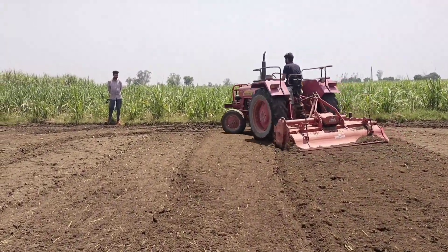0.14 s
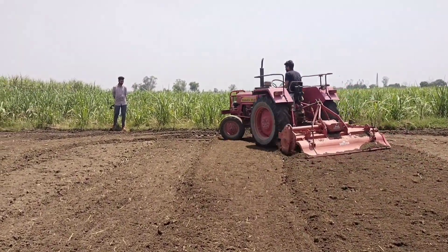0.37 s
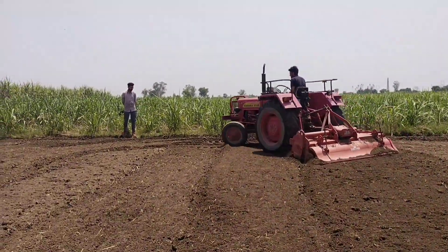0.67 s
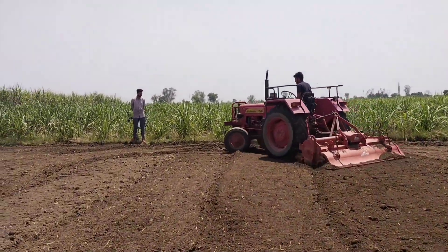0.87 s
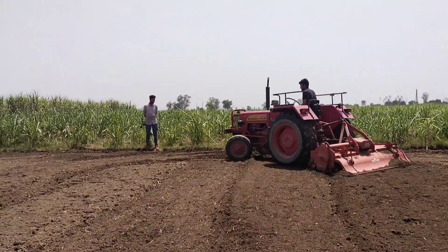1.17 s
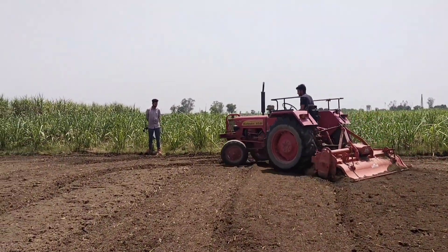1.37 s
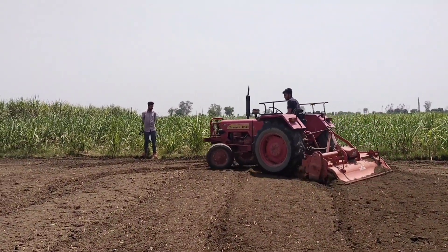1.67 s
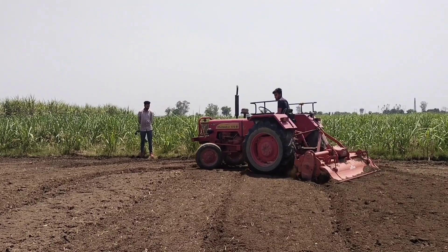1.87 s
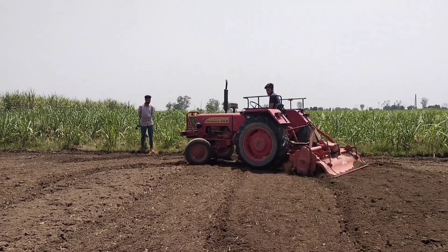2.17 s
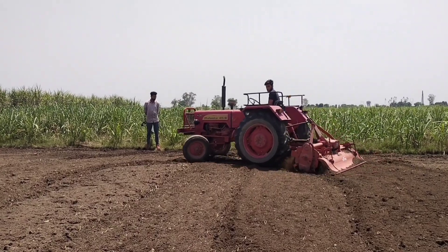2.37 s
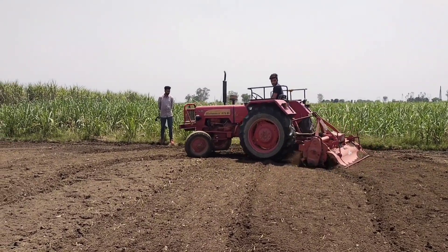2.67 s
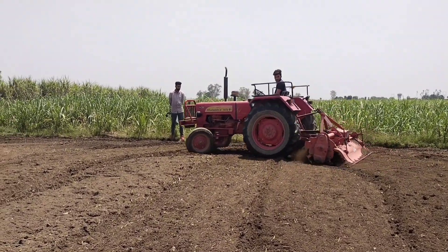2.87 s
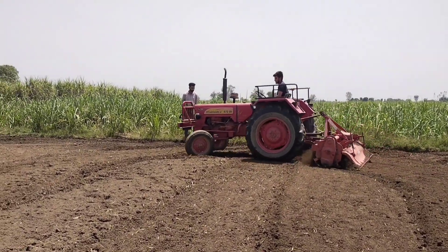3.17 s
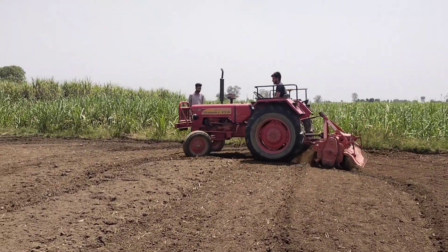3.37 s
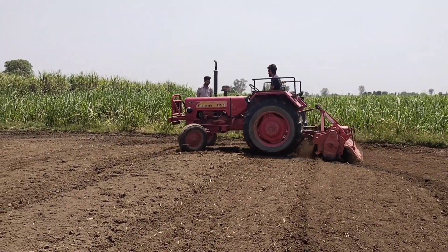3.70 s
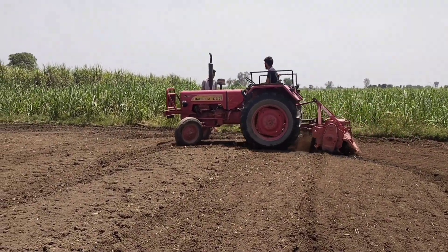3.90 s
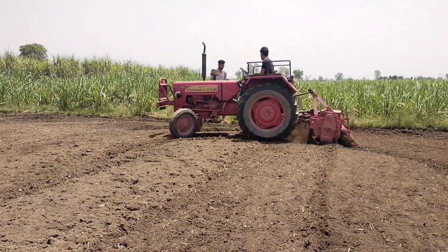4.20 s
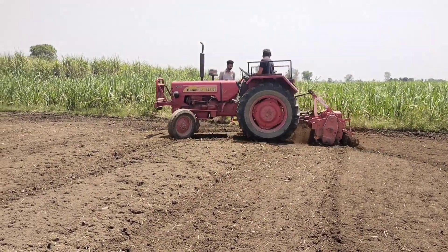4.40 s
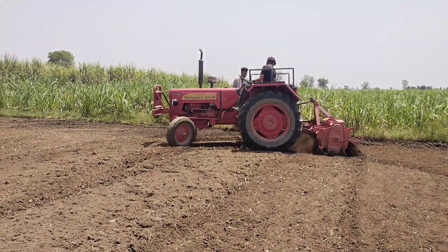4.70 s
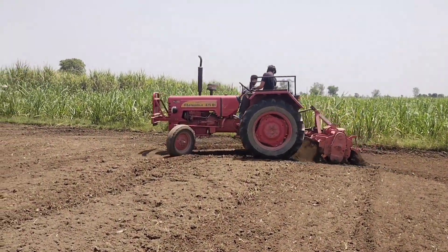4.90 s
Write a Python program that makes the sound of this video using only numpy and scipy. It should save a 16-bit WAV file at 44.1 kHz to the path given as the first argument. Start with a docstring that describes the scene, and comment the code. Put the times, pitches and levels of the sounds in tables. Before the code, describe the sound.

Close outdoor tractor and rotary tiller: rapid diesel chatter, rattling panels, whining gears and scattered metal knocks, growing brighter as the machine turns.

```python
"""A four-cylinder diesel tractor drags a rotary tiller round a bare field, some metres from a hand-held phone.
From the start: exhaust beats built from sines, a gear whine, a clatter of noise that swells at every firing, and
ringing sheet metal made of narrow noise. The clatter comes straight and again off the soil; the walking bearer
makes that echo bob. The engine sags near 1.4 s as the tiller bites, then recovers; heavy knocks come from 0.5 s and
sharp clacks from 1.6 s. From 3.4 s a bright band climbs, the tractor turns and the phone is lowered."""
import sys
import numpy as np
from scipy import signal
from scipy.fft import rfft, irfft
from scipy.io import wavfile
from scipy.ndimage import uniform_filter1d, map_coordinates

SR = 44100
rng = np.random.default_rng(int(sys.argv[2]) if len(sys.argv) > 2 else 0)


def generate_wav(signal):
    """Clip the signal to [-1, 1] and save it as 16-bit WAV at the path in sys.argv[1]."""
    frames = np.transpose(np.atleast_2d(signal))
    scaled = np.clip(frames, -1, 1) * 32767
    pcm = np.round(scaled).astype(np.int16)
    wavfile.write(sys.argv[1], SR, pcm)


N = 222705  # length in samples

# Engine speed. Each row: time in seconds, firings per second in Hz.
FIRING_RATE = [(0.0, 62.38), (0.34, 61.65), (0.67, 61.21), (1.01, 60.41), (1.35, 57.99), (1.68, 58.53),
               (2.02, 60.9), (2.36, 62.11), (2.69, 61.46), (3.03, 63.87), (3.37, 62.94), (3.7, 61.44),
               (4.04, 61.95), (4.38, 62.44), (4.71, 62.6), (5.05, 63.39)]
FIRING_START = .57  # firings already counted at 0 s
KNOCK_AT = .62  # share of a firing period from the exhaust beat to the knock
# How hard each cylinder knocks, one number per cylinder, in the units of the throb (0 is average).
CYLINDER_KNOCK = [0, -.5, .4, .8]

# The turn of the machine. Each row: time in seconds, how far it has turned (0-1).
TURN = [(0, 0.01), (3.6, 0.01), (4.0, 0.07), (4.3, 0.64), (4.7, .95), (5.05, 0.98)]
# The lowering of the phone. Each row: time in seconds, how far it has been lowered (0-1).
LOWERED = [(0, 0.08), (3.5, 0.04), (3.75, .2), (3.9, 0.27), (4.05, 0.57), (4.25, 0.53), (4.55, 0.95),
           (5.05, 1)]
LEAD_MS, LEAD_TURNED_MS = 0.039, -0.0036  # how much earlier the left port hears, before and after the turn
SOIL_MS, SOIL_LOWERED_MS = 1.586, 1.251  # soil echo delay before and after the phone is lowered
BOB_MS, BOB_PERIOD_S, BOB_LOW_S = 0.07, 0.752, 0.13  # the walking bearer lifts and lowers the phone
SOIL_PHASE, SOIL_PHASE_TURNED = 0.23, 0.98  # phase lead that loose soil gives the echo, rad
UNLIKE_ECHO_DELAY = 1.001  # soil echo delay of the noise that differs between the two ports, as a multiple of the shared noise's
HIGH_ECHO_TURNED = 0.34  # factor on the soil echo once the machine has turned: on the noise that differs between the ports, and on all echo above 3 kHz

# Exhaust. Each row: time in seconds, stack boom in dB, steady hum in dB.
EXHAUST_LEVELS = [(0.0, -35, -37.5), (0.15, -45, -43), (0.45, -51.5, -51.5), (1.03, -53, -53.5),
                  (1.2, -45, -64), (1.32, -42, -57), (1.41, -49, -55), (1.5, -40, -60), (1.8, -46, -68),
                  (2.1, -41, -62), (2.25, -47, -46.5), (2.42, -46.5, -55), (2.56, -37.5, -42),
                  (2.72, -39.5, -59.5), (2.92, -35.5, -59), (3.01, -34.5, -62), (3.07, -37, -58),
                  (3.25, -37.5, -58), (3.31, -38, -57), (3.36, -32, -55), (3.41, -40, -56),
                  (3.46, -32, -50), (3.52, -38, -48), (3.62, -34, -58), (3.71, -41, -60), (3.79, -33, -64),
                  (3.86, -42, -54), (3.95, -39.5, -48.5), (4.1, -41.5, -59.5), (4.17, -39, -54),
                  (4.3, -39.5, -48.5), (4.4, -41, -50), (4.6, -33, -57), (4.75, -40.5, -54),
                  (5.05, -38, -45)]
# Tones in the boom. Each row: multiple of the four-firing cycle, level against the other tones in dB.
BOOM_TONES = [(3, -28), (5, -20), (6, -31), (7, -13), (8, 4), (9, -3), (10, -5), (11, -7), (12, -8.5),
              (13, -13.5), (14, -21)]
HUM_HZ = 271
BEAT_DB, BEAT_RISE_DB_PER_S = -58, .5  # firing beat at the start, and its gain as the machine nears
EXHAUST_PAN_DB, EXHAUST_SWAY_DB = 0.74, 0.4  # left minus right, and how it sways in the hand

# Gear whine. Each row: time in seconds, pitch in Hz, level in dB, share of haze in its power (0-1).
WHINE = [(0, 1682, -46.5, 0.6), (.9, 1710, -42, 0.7), (1.25, 1670, -42.5, 0.3), (1.5, 1666, -46.5, 1),
         (1.7, 1714, -37.5, 0), (1.95, 1715, -35, 0.3), (2.2, 1725, -35, 0.25), (2.7, 1713, -35, 0.1),
         (2.95, 1741, -47, 0.2), (3.15, 1724, -38.5, 0.5), (3.45, 1732, -39.5, .2), (3.55, 1747, -41, 0.7),
         (3.75, 1723, -35.5, 0.8), (3.95, 1715, -33.5, 0.06), (4.3, 1700, -32, 0.5), (4.6, 1696, -29.5, .4),
         (4.8, 1711, -29, 0.46), (5.05, 1695, -34, 0.2)]
WHINE_PULSE_DB = 2.6  # swell once a crankshaft turn
WHINE_DIP_DB, WHINE_DIP_AT = 1.6, 1.2  # dip once a cycle, centred on this firing

# Frequency bands of the parts. Each row: from Hz, to Hz, throb in dB (twice its spread), flicker in dB,
# share unlike at the two ports, extra lead of the left port round the phone's body in ms,
# strength of the soil echo left, strength of the soil echo right.
BANDS = [(74.6, 533, 3, -0.5, 0.025, 0.0073, 0.5, 0.5), (701, 1010, 1.5, 1.5, 0.071, 0.0069, 1, 0.48),
         (1096, 1580, 2, 1.8, 0.11, 0.027, 0.85, 0.87), (1730, 2780, 2.5, 0.45, 0.21, 0.053, 1, 0.38),
         (2640, 3310, 2.5, 1.74, 0.44, 0.078, 0.9, 0.19), (3400, 5520, 2.8, 1.1, 0.69, 0.0044, 0.85, 0.15),
         (6500, 8600, 3.5, 1.74, 1, 0.0033, 0.5, 0.13), (10400, 48000, 2.5, 2.5, 0.4, -0.025, .05, .05)]
# Tone colour of the clatter; only its shape matters. Each row: frequency in Hz, relative level in dB.
COLOUR = [(35, -47), (60, -17), (87, -8), (124, -7), (227, -3), (379, 1.5), (837, -13), (1010, -4),
          (1330, -12.5), (1570, -5.5), (1720, 1), (3550, -4), (4590, -4.5), (9030, 13), (15800, -14)]
# Narrow resonances of the castings. Each row: frequency in Hz, width in Hz, lift in dB.
CASTING = [(459, 22, -4), (584, 53, 9.5), (2265, 360, 12), (3210, 16, 8.5), (3990, 220, 4)]
# Left minus right, one row each below 1.6 kHz, to 2.5 kHz, to 3.4 kHz, to 6.5 kHz and above.
# Each row: dB at the start, drift in dB per second, change once turned in dB.
PAN = [(-2, -0.34, 6.5), (-7.5, 0.04, 15.5), (3.5, -1.2, -1), (2, 0.7, 2), (-8.5, 1, -8)]
# Block, bonnet, guards, gearbox, tiller hood, valve tick, air hiss. Each row: level at the start in dB,
# gain while nearing in dB per second, change once turned in dB, share of the common level it follows (0-1).
PART_LEVELS = [(-46.5, 0.5, -2, 0), (-45.5, 1.82, -3.5, 0.05), (-40, 0.76, -1, 0.93), (-40.5, 0.76, 5, 1),
               (-44.5, 1.28, -1.5, 1), (-46.5, 1.61, -5, 0.44), (-59, 2.5, -4.5, 0.23)]
# Common levels. Each row: time in seconds, clatter in dB, extra for gearbox in dB, extra for treble in dB.
COMMON_LEVELS = [(0, -1.5, -10, -1), (.15, 0, -4, -2.5), (.34, -1, 1, -2), (.42, -4.5, 3, 3),
                 (.48, -1.5, 2, 2), (.65, -0.5, 4.5, 1), (.82, -2, 4, 2.5), (1.0, -0.5, 0, 2),
                 (1.12, -0.5, 3.5, 4.5), (1.27, 1.5, 0, 2.5), (1.42, -1.5, 3.5, 1.5), (1.55, -2, 0, 0.5),
                 (1.8, 0, 0, 1), (2.0, 0.5, 3, 3), (2.2, 1.5, 1, -1), (2.4, 2, -2, -2), (2.58, 1, 0, -0.5),
                 (2.75, -1.5, 6, 3), (3.1, -0.5, 0, 1), (3.25, -0.5, -2.5, 0.5), (3.45, 1, -7, 0),
                 (3.8, 2, -3, 0.5), (3.93, 2, -9, -0.5), (4.05, 0, -3.5, 0.5), (4.18, 0, -2, 0.5),
                 (4.3, 1.5, -1.5, 4.5), (4.5, 1, 2.5, -1.5), (4.75, -3, 3.5, 0), (5.05, -1.5, 0.5, -8)]
# Low clatter of the block. Each row: time in seconds, extra level in dB.
BLOCK_EXTRA = [(0, 0), (.9, 0), (1.15, -2), (1.35, 3.5), (1.6, 1.5), (1.8, -5), (2.3, 1), (2.9, -4),
               (3.4, -1.5), (4.3, -2), (4.7, 1.5), (5.05, -1)]
# Hiss above 10 kHz. Each row: time in seconds, level in dB.
TOP_HISS = [(0, -75.5), (.8, -68.5), (1.5, -63), (2.95, -57), (3.2, -59), (3.3, -68.5), (3.65, -58),
            (3.9, -54.5), (4.2, -53.5), (4.45, -60), (5.05, -55)]
LURCH_DB = 1.5  # the lower parts shake over clods

# Rings of the panels. Each row: pitch in Hz, pitch once turned in Hz, level against the part in dB,
# that level once turned in dB.
RINGS = [(802, 890, -10, 6.5), (1330, 2900, -3.5, -9), (2042, 2800, -9, -9.5), (2744, 1500, -9.5, -18)]
# Width of each ring, one number per ring, in Hz.
RING_WIDTH_HZ = [75, 105, 124, 150]
# Moments when a ring swells up and glides. Each row: ring number, middle in seconds, length in seconds,
# from Hz, to Hz, width in Hz, level against the part in dB.
SWELLS = [(0, 0.24, 1.04, 598.4, 568, 88.8, 1), (0, 0.728, 0.34, 739, 734, 61, 5),
          (0, 1.17, 0.61, 773, 753, 62.8, 3), (0, 1.87, 0.54, 449, 463, 50, -4.5),
          (0, 2.75, 0.75, 795, 801, 75, -1), (0, 3.65, 1.297, 474.6, 455, 21.76, -6.5),
          (0, 3.98, 0.63, 831, 817, 78.95, 3), (0, 4.4, 0.55, 813, 911, 106, 8),
          (0, 4.3, .35, 900, 880, 121, 10), (0, 5.0, 0.407, 866, 1000, 222, 11.5),
          (1, 0.51, 0.41, 1260, 1300, 120, 6), (1, 0.88, 0.63, 1413, 1500, 113, 8.5),
          (1, 1.01, 0.46, 1410, 1230, 143, 6.5), (1, 1.44, 0.55, 1314, 1309, 75, 9.5),
          (1, 1.77, 0.408, 1222, 1160, 119, 10), (1, 1.77, 0.66, 1314, 1312, 70, 3),
          (1, 2.1, 0.6, 1261, 1397, 109.5, 4), (1, 2.3, 0.524, 1120, 1080, 103, -1),
          (1, 2.75, 0.597, 1180, 1107, 89.5, 3), (1, 3.1, 0.38, 1456, 1426, 94, -2),
          (1, 4.0, 0.6, 1453, 1496, 150, -1), (1, 0.152, 0.3, 1302, 1346, 91, -1),
          (2, 0.14, 0.48, 2090, 2080, 70, 2), (2, 0.54, 0.6, 1766, 1896, 106, 0),
          (2, 0.95, 0.69, 2103, 2125, 68, 1.5), (2, 2.06, 0.28, 1910, 1933, 92, -1.5),
          (2, 3.2, 0.84, 2020, 1950, 122, 2.5), (2, 6.1, 1.1, 2262, 2400, 348, -3),
          (2, 4.9, 0.6, 1796, 1863, 150, -1), (3, 2.6, 2, 3006, 2588, 397, 3),
          (3, 3.87, 0.98, 2814, 2945, 140, 2), (3, 3.93, .45, 3310, 3890, 250.4, -6.5),
          (3, 3.98, 0.25, 4270, 4530, 300, -9.5), (3, 3.5, 0.55, 4400, 5068, 250, -4.5),
          (3, 4.5, .35, 4100, 4700, 300, -4), (1, 3.55, 0.396, 1320, 1385, 99, -0.5),
          (2, 4.2, 0.47, 1625, 1670, 40, 2.5), (2, 4.0, 0.31, 1536, 1550, 80, -6),
          (2, 3.0, .4, 1790, 1770, 50, -5), (0, 4.6, 0.82, 474, 619, 201, -13.5),
          (0, 2.35, 0.497, 885, 950, 150, 0.5), (1, 0.958, 0.12, 1487, 1483, 50.4, 11.5),
          (3, .15, .6, 3166, 3280, 150, -3), (3, .03, .14, 2620, 2600, 99, -2)]
JOLT_SCATTER_DB = 1.6  # no two firings jolt a panel alike
# Whistles before the turn. Each row: pitch in Hz, level in dB, gone by this time in seconds, width in Hz.
WHISTLES = [(3205, -51.5, 1.22, 117), (5040, -53, 0.96, 82)]
WHISTLE_FADE_S = 0.25
# Moving hollows, narrow gaps in the sound that glide in pitch. Each row: middle in seconds, length in seconds,
# # from Hz, to Hz, width in Hz, depth (0-1).
HOLLOWS = [(.17, .5, 2430, 2460, 260, .7), (.25, 0.43, 2900, 2760, 200, 0.5),
           (0.045, 0.17, 960, 903, 194.5, 0.23), (1.55, .35, 2550, 2620, 300, 0.8),
           (1.951, 0.7, 910, 850, 179, 0.36), (2.853, 0.65, 3570, 3600, 250, 0.66),
           (3.25, 0.43, 2300, 2201, 200, 0.5), (3.845, 0.54, 3700, 4300, 301, 0.63),
           (4.005, 0.24, 4640, 5900, 500, 0.76), (4.048, 0.41, 2540, 2840, 170, .9),
           (4.099, 0.24, 3050, 3300, 200, .8), (4.4, 0.56, 3730, 3700, 350, 0.75),
           (4.701, 0.75, 1250, 1440, 260, 0.4)]

# Heavier knocks in the block. Each row: time in seconds, peak in dB before the echo, left minus right in dB,
# pitch as a multiple of the modes below.
THUMPS = [(0.478, -17, -3, .97), (0.815, -20, -9, 1.09), (0.827, -25, 0, 1.09), (0.846, -28, -3.5, 1.09),
          (0.863, -27, -6, 1.09), (0.96, -22, -12, 1.11), (0.978, -26, -6, 1.05), (1.042, -23.5, -7, 1.01),
          (1.062, -19.5, -3, .97), (1.559, -27, -10, 1.01), (1.656, -22.5, -11, 1.01),
          (1.776, -23, -5, .88), (1.807, -24, -3, .89), (1.993, -29, -3.5, 1.02), (2.724, -29.5, -3, .92),
          (4.166, -26, 5, 1.01), (4.488, -33, 3.5, 1.01)]
# Modes of the knocks. Each row: frequency in Hz, level in dB, decay time by 60 dB in seconds.
THUMP_MODES = [(822, -13, 0.027), (1319, 4, 0.021), (1700, -12.5, 0.015), (2277, -14, 0.025)]
THUMP_SOIL = 0.29  # strength of the knocks' soil echo
# Sharper clacks above the clatter. Each row: time in seconds, peak in dB, left minus right in dB.
CLACKS = [(1.5896, -35, 12), (1.944, -44, 2), (3.182, -22.5, 1), (3.6162, -25, 2), (3.9705, -48, 8),
          (4.1337, -42, 18), (4.1954, -28, 11), (4.2612, -27.5, 5)]
# Modes of the clacks. Each row: frequency in Hz, level in dB, decay time by 60 dB in seconds.
CLACK_MODES = [(3080, 5, 0.014), (4100, 3, 0.0084), (4700, 17, 0.0081), (5900, 5, 0.004),
               (6940, -20, 0.005)]
# The climbing bright band. Each row: time in seconds, centre in Hz, level in dB.
SWISH = [(3.4, 3367, -64), (3.7, 3770, -55), (3.95, 4200, -38), (4.15, 5030, -38.5), (4.3, 5900, -48),
         (4.5, 6420, -83)]

BASS_CUT_HZ, TOP_HZ = 25, 15700  # limits of the phone


def undb(db):
    """Turn decibels into a plain factor."""
    return 10 ** (np.asarray(db) / 20)


def unit(x):
    """Scale to rms 1."""
    return x / np.sqrt(np.mean(x ** 2))


def curves(table):
    """Columns of a table that starts with time, drawn out to every sample."""
    s, *columns = np.transpose(table)
    return [np.interp(np.arange(N) / SR, s, c) for c in columns]


def walk(rate):
    """A slow random wander: levels held 1 / rate seconds, smoothed twice, spread 1."""
    hold = int(SR / rate)
    steps = np.repeat(rng.standard_normal(N // hold + 1), hold)
    smooth = uniform_filter1d(uniform_filter1d(steps, hold), hold)
    return unit(smooth[:N])


def turning(before, after):
    """A quantity that moves from one value to another as the machine turns."""
    return before + (after - before) * curves(TURN)[0]


def drifting(start_db, db_per_s, turned_db):
    """A level that creeps as the machine nears and shifts as it turns."""
    return start_db + db_per_s * np.arange(N) / SR + turning(0, turned_db)


def late(x, ms):
    """Sound x heard later, by a delay that may move."""
    return map_coordinates(x, [np.arange(N) - ms * SR / 1000], order=3, mode="nearest")


def ports(x, lead_ms, pan_db):
    """One source at the two microphone ports: a small time lead and level difference place it."""
    both = np.array([late(x, -lead_ms / 2), late(x, lead_ms / 2)])
    return both * undb(np.array([[1], [-1]]) * pan_db / 2)


def soil_delay():
    """Echo delay in ms: bobbing with each stride, shorter and steadier once the phone is held lower."""
    t, low = np.arange(N) / SR, np.clip(curves(LOWERED)[0], 0, 1)
    bob = BOB_MS * np.cos(2 * np.pi * (t - BOB_LOW_S) / BOB_PERIOD_S)
    return SOIL_MS + (SOIL_LOWERED_MS - SOIL_MS) * low - bob * (1 - low) ** 2


def off_soil(x, ms):
    """The soil echo of both channels: late and turned in phase."""
    lead = turning(SOIL_PHASE, SOIL_PHASE_TURNED)
    quadrature = irfft(1j * rfft(x), N)  # every tone a quarter cycle ahead
    turned = x * np.cos(lead) + quadrature * np.sin(lead)
    return np.array([late(channel, ms) for channel in turned])


def ring(hz, width_hz):
    """Noise in a narrow resonance whose centre moves: slow noise shifted up to the pitch."""
    low_pass = signal.butter(4, width_hz / 2, fs=SR, output="sos")
    slow = signal.sosfilt(low_pass, rng.standard_normal((2, N)))
    phase = 2 * np.pi * np.cumsum(hz) / SR
    return unit(slow[0] * np.cos(phase) + slow[1] * np.sin(phase))


def knock_number(firings):
    """Count of the knocks so far, at every sample."""
    return np.floor(firings - KNOCK_AT + 1).astype(int)


def throb(firings):
    """Each knock pushes the level up and it dies away; mean 0 and spread 1."""
    push = np.exp(-((firings - KNOCK_AT) % 1) / .5)
    return unit(uniform_filter1d(push, size=160) - push.mean())


def uneven(firings):
    """A new random strength at every knock, spread about 1."""
    strengths = rng.standard_normal(N // 500)
    return uniform_filter1d(strengths[knock_number(firings)], size=160)


def part_levels():
    """Level of each sounding part in dB, from its own drift and the common levels."""
    clatter_db, gearbox_db, treble_db = curves(COMMON_LEVELS)
    levels = [drifting(*row) + share * clatter_db for *row, share in PART_LEVELS]
    levels[0] = levels[0] + curves(BLOCK_EXTRA)[0]
    levels[3] = levels[3] + gearbox_db
    return levels[:5] + [db + treble_db for db in levels[5:]]


def exhaust(firings):
    """Beats at multiples of the engine cycle, each wavering because no two firings are alike."""
    boom_db, hum_db = curves(EXHAUST_LEVELS)
    beat_db = drifting(BEAT_DB, BEAT_RISE_DB_PER_S, 0)
    cycle = 2 * np.pi * firings / len(CYLINDER_KNOCK)
    boom = 0
    for k, db in BOOM_TONES:
        # multiple 8, twice the firing rate, is steadier than the rest
        waver_db, waver_rad = (1.2, .3) if k == 8 else (3.5, 1.4)
        level = undb(db + waver_db * walk(16))
        phase = k * cycle + 2 * np.pi * rng.random() + waver_rad * walk(10)
        boom = boom + level * np.sin(phase)
    beat = undb(.6 * walk(10)) * np.sin(2 * np.pi * firings)
    hum = np.sin(2 * np.pi * HUM_HZ * np.arange(N) / SR + 1.32 * walk(20))
    return undb(beat_db) * unit(beat) + undb(boom_db) * unit(boom) + undb(hum_db) * unit(hum)


def whine(firings):
    """Gear teeth: a tone shaken once an engine cycle, which gives close side tones, in a thin haze."""
    hz, level_db, haze = curves(WHINE)
    cycle = 2 * np.pi * firings / len(CYLINDER_KNOCK)
    tone = np.sin(2 * np.pi * np.cumsum(hz) / SR + np.sin(cycle) + .5 * walk(10))
    dip = np.cos(cycle - 2 * np.pi * WHINE_DIP_AT / len(CYLINDER_KNOCK))
    pulse = undb(WHINE_PULSE_DB * np.cos(2 * cycle) - WHINE_DIP_DB * dip)
    haze = np.clip(haze, 0, 1)
    mix = np.sqrt(1 - haze) * unit(tone) + np.sqrt(haze) * ring(hz, 79)
    return undb(level_db) * unit(pulse * mix)


def band(x, lo_hz, hi_hz):
    """Colour noise like the machine, with its casting resonances, between two soft edges."""
    hz = np.maximum(np.arange(N // 2 + 1) * SR / N, 1)
    colour_hz, colour_db = np.array(COLOUR).T
    db = np.interp(np.log(hz), np.log(colour_hz), colour_db)
    db = db + sum(lift / (1 + (2 * (hz - f) / width) ** 2) for f, width, lift in CASTING)
    edges = 1 / np.sqrt((1 + (lo_hz / hz) ** 24) * (1 + (hz / hi_hz) ** 24))
    return irfft(rfft(x) * undb(db) * edges, N)


def knocks(firings):
    """Each cylinder shakes the block with its own short noise burst, the same every cycle."""
    at = np.flatnonzero(np.diff(np.floor(firings - KNOCK_AT)))
    t, out = np.arange(SR // 30) / SR, 0
    for k in range(len(CYLINDER_KNOCK)):
        blows = np.zeros(N)
        blows[at[k::len(CYLINDER_KNOCK)]] = 1
        burst = rng.standard_normal(len(t)) * np.exp(-t / .01)
        out = out + signal.fftconvolve(blows, burst)[:N]
    return unit(out)


def clatter(firings, lead_ms, pans):
    """Dense mechanical noise from each part, swelling at every firing, doubled by the soil."""
    beat, number = throb(firings), knock_number(firings)
    cylinder = np.array(CYLINDER_KNOCK)[number % len(CYLINDER_KNOCK)]
    noise = rng.standard_normal((3, N))
    shared = ports(unit(noise[0] + 0.5 * knocks(firings)), lead_ms, 0)
    own = noise[1:]  # noise that differs between the two ports
    soil_ms = soil_delay()
    shared_echo = off_soil(shared, soil_ms)
    own_echo = off_soil(own, soil_ms * UNLIKE_ECHO_DELAY) * turning(0.74, HIGH_ECHO_TURNED)
    levels = part_levels() + [curves(TOP_HISS)[0]]
    lurch_db = LURCH_DB * walk(9)
    out = 0
    for row, level_db, pan_db in zip(BANDS, levels, pans):
        lo, hi, throb_db, flicker_db, unlike, extra_ms, *soil = row
        unlike = np.clip(unlike, 0, 1)
        soil = np.array(soil)[:, None] * (turning(1, HIGH_ECHO_TURNED) if lo > 3000 else 1)
        # a wide machine reaches the two ports by different paths, more so in the treble
        alike_part = np.sqrt(1 - unlike) * (shared + soil * shared_echo)
        unlike_part = np.sqrt(unlike) * (own + soil * own_echo)
        heard = unit(band(alike_part + unlike_part, lo, hi))
        heard = np.array([heard[0], late(heard[1], extra_ms)])
        strengths = cylinder + .55 * rng.standard_normal(N // 500)[number]
        scatter = uniform_filter1d(strengths, size=200)
        swell_db = level_db + throb_db * (beat + scatter) / 2 + flicker_db * walk(14)
        swell_db = swell_db + lurch_db * (lo < 3000)
        out = out + heard * undb(swell_db) * undb(np.array([pan_db, -pan_db]) / 2)
    return out


def panels(firings, lead_ms, pans):
    """Sheet metal rings at its own pitches, jolted by the firings; now and then a ring swells."""
    t, parts = np.arange(N) / SR, []
    for (hz, turned_hz, db, turned_db), width_hz in zip(RINGS, RING_WIDTH_HZ):
        level = undb(turning(db, turned_db) + 0.88 * walk(3.78))
        parts.append(level * ring(turning(hz, turned_hz), width_hz))
    for k, s, length, from_hz, to_hz, width_hz, db in SWELLS:
        k, along = round(k), np.clip((t - s) / length + .5, 0, 1)
        glide = ring(from_hz + (to_hz - from_hz) * along, width_hz)
        parts[k] = parts[k] + undb(db) * np.sin(np.pi * along) * glide
    jolt_db = 1.26 * throb(firings)
    out = 0
    for x, part_db, pan_db in zip(parts, part_levels()[1:], pans):
        level_db = part_db + jolt_db + JOLT_SCATTER_DB * uneven(firings)
        out = out + ports(undb(level_db) * x, lead_ms, pan_db)
    return out


def whistles():
    """Narrow bands of noise that ring like whistles, each fading out early on."""
    t, out = np.arange(N) / SR, 0
    for hz, db, end, width_hz in WHISTLES:
        fade = np.clip((end - t) / WHISTLE_FADE_S, 0, 1)
        out = out + fade * undb(db + walk(2.7)) * ring(np.full(N, hz), width_hz)
    return out


def hollowed(x):
    """Take a gliding narrow band out of the sound for a moment."""
    t = np.arange(N) / SR
    for s, length, from_hz, to_hz, width_hz, depth in HOLLOWS:
        along = np.clip((t - s) / length + .5, 0, 1)
        # shift the band down to 0 Hz, pick it out, shift it back and subtract it
        spin = np.exp(2j * np.pi * np.cumsum(from_hz + (to_hz - from_hz) * along) / SR)
        low_pass = signal.butter(2, width_hz / 2, fs=SR, output="sos")
        slow = signal.sosfiltfilt(low_pass, x / spin)
        amount = np.clip(depth, 0, 1) * np.sqrt(np.sin(np.pi * along).clip(0))
        x = x - 2 * amount * (slow * spin).real
    return x


def struck(blows, modes):
    """A scraping blow shakes a few stiff modes for some milliseconds."""
    out, t = np.zeros((2, N + SR)), np.arange(SR // 20) / SR
    for s, db, pan_db, *pitch in blows:
        ringing = 0
        for hz, mode_db, t60 in modes:
            # each mode swells before it fades, so no click reaches the top octave
            envelope = t / t60 * np.exp(-np.log(1000) * t / t60)
            ringing = ringing + undb(mode_db) * np.sin(2 * np.pi * hz * np.prod(pitch) * t) * envelope
        scrape = rng.standard_normal(len(t)) * t * np.exp(-t / .002)
        hit = signal.fftconvolve(scrape, ringing)[:len(t)]
        i = int(s * SR)
        level = undb(db + np.array([[pan_db], [-pan_db]]) / 2)
        out[:, i:i + len(t)] += hit / np.abs(hit).max() * level
    return out[:, :N]


def thumps():
    """The heavier knocks shake low modes of the block, heard straight and again off the soil."""
    blows = struck(THUMPS, THUMP_MODES)
    return blows + THUMP_SOIL * off_soil(blows, soil_delay())


def clacks():
    """Sharper blows shake high, short-lived modes."""
    return struck(CLACKS, CLACK_MODES)


def swish(firings):
    """A broad band of noise climbs in pitch, throbbing with the engine."""
    hz, level_db = curves(SWISH)
    return undb(level_db + 1.9 * throb(firings)) * ring(hz, 2500)


def scene():
    """Run the engine, place each source at the two ports and add them up."""
    firings = FIRING_START + np.cumsum(curves(FIRING_RATE)[0]) / SR
    lead_ms = turning(LEAD_MS, LEAD_TURNED_MS)
    mid, upper, *high = (drifting(*row) for row in PAN)
    exhaust_pan = EXHAUST_PAN_DB + EXHAUST_SWAY_DB * walk(1.39)
    tones = ports(exhaust(firings), lead_ms, exhaust_pan) + ports(whine(firings), lead_ms, upper)
    noise = clatter(firings, lead_ms, [0 * mid, mid, mid, upper, *high, 0.5 * high[-1]])
    rings = panels(firings, lead_ms, [mid, mid, upper, high[0]])
    rings = rings + ports(whistles(), lead_ms, high[0])
    noise = noise + ports(swish(firings), lead_ms, high[1])
    return tones + hollowed(rings + noise) + thumps() + clacks()


def record(dry):
    """The phone thins the deepest bass and cuts the top."""
    bass_cut = signal.butter(2, BASS_CUT_HZ, "high", fs=SR, output="sos")
    top_cut = signal.ellip(10, .2, 80, TOP_HZ, fs=SR, output="sos")
    return signal.sosfilt(top_cut, signal.sosfilt(bass_cut, dry))


dry = scene()
out = record(dry)
generate_wav(out)
```